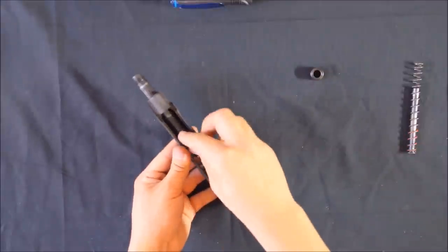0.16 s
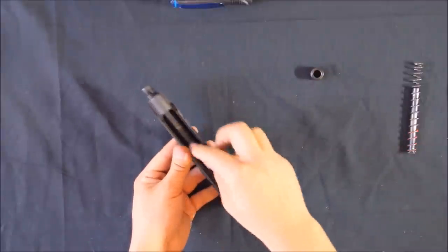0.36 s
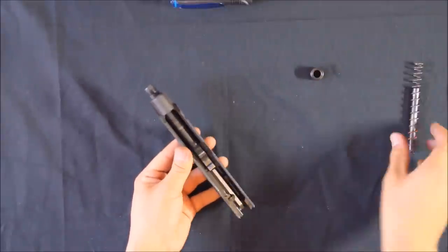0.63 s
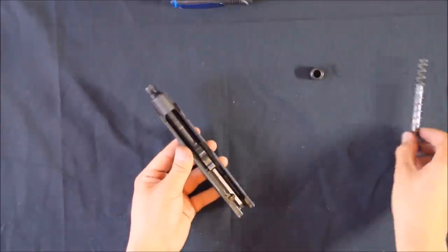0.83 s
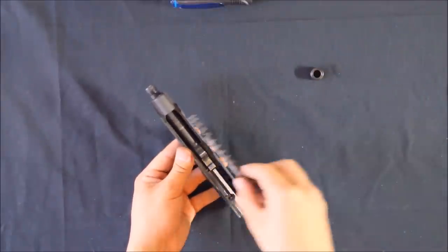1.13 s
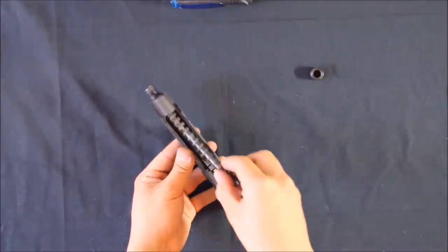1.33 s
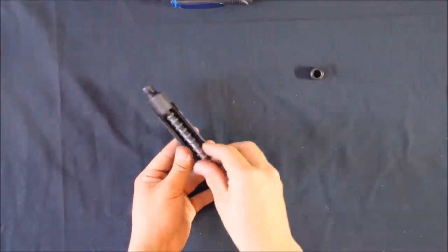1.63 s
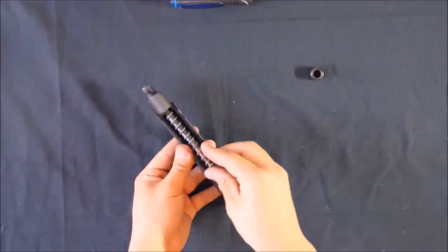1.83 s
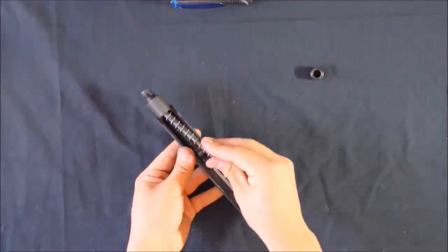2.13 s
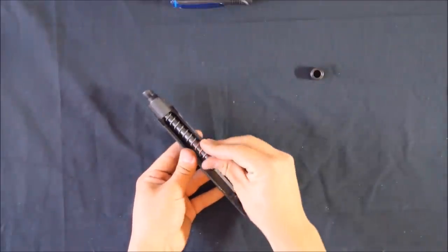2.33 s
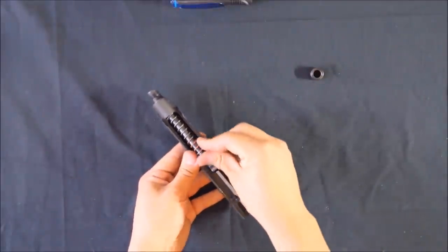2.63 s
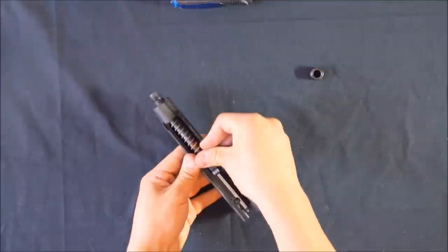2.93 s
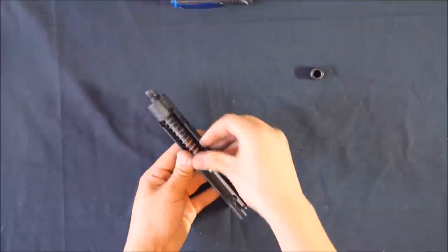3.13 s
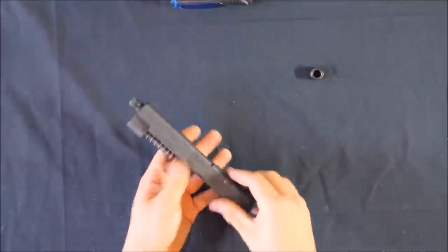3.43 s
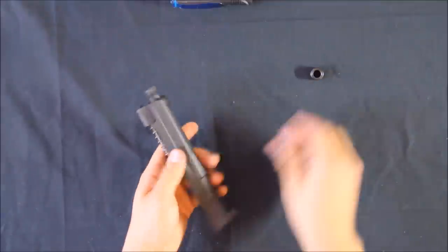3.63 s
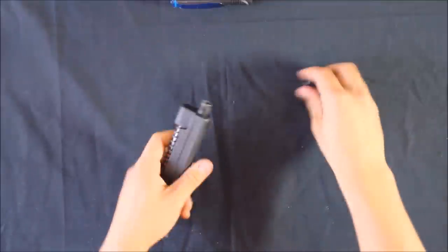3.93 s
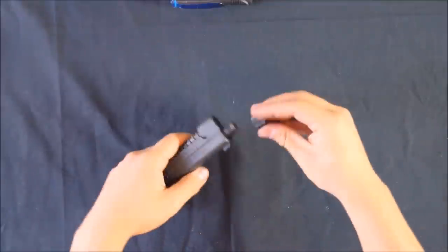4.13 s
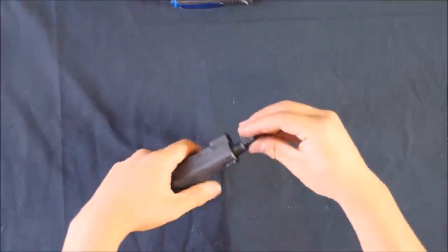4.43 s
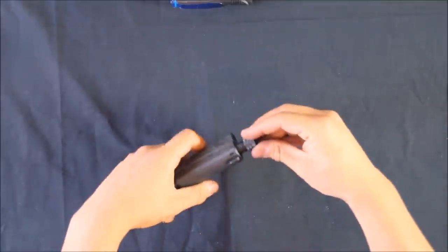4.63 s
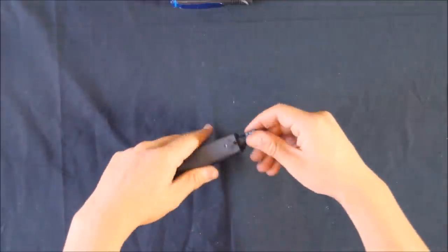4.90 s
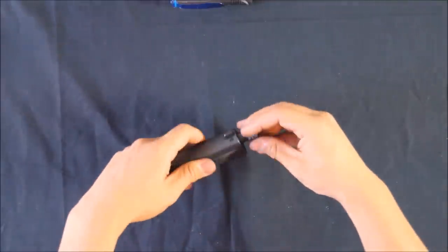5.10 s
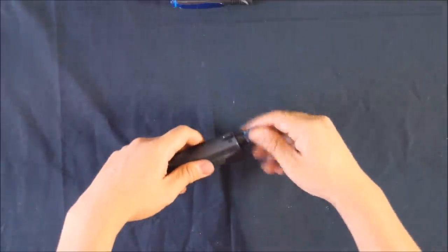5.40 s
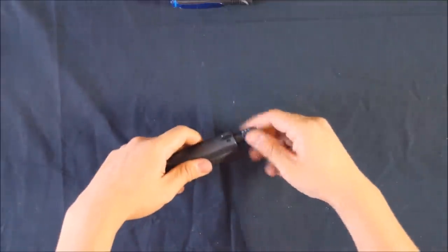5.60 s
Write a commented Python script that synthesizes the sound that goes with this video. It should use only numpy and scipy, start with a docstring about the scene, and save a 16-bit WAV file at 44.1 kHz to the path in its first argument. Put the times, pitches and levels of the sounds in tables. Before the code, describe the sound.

Steel pistol parts are fitted together by hand. A barrel drops into the slide with a quick cluster of clicks and a loud, bright clink. A spring grazes faintly, a guide rod clicks several times, then snaps sharply home. After a soft brush of hands, a small cap taps onto the muzzle with tiny thread squeaks. The sounds are close, in a small, hard-walled room with a faint fan hum.

```python
"""A faint scrape and a bright clink of steel come first: a barrel drops into a pistol slide, assembled by
hand over a cloth-covered table in a small, hard-walled room. The recoil spring grazes its way in, the
guide rod clicks and snaps home, hands brush, and a steel cap is set on the muzzle. Impacts excite the
damped modes of each part. A fan hums; the loudest blows clip and briefly duck the gain."""
import sys
import numpy as np
from scipy import signal
from scipy.fft import rfft, irfft, next_fast_len
from scipy.io import wavfile
from scipy.ndimage import map_coordinates

SR = 44100
rng = np.random.default_rng(int(sys.argv[2]) if len(sys.argv) > 2 else 0)


def master(y):
    """Save y as 16-bit WAV."""
    cut = np.clip(np.atleast_2d(y).T, -1, 1)
    pcm = np.round(cut * 32767)  # scale
    wavfile.write(sys.argv[1], SR, pcm.astype(np.int16))


N = 254016

# Clear modes of each steel part. Each row: frequency in Hz, relative level in dB, t60 in seconds.
SLIDE_MODES = [(1210, -27.5, 0.11), (1786, -12, 0.081), (2993, -15, 0.11), (3894, -16.5, .08),
               (4030, -13, 0.11), (4844, -6, .13), (4875, -9, .14), (4980, -12, .16), (5070, -10.5, 0.073),
               (6250, -10, 0.091), (7130, -14.5, 0.072), (7260, -12, 0.088), (8250, -14, .12),
               (8680, -6, 0.075), (10424, -13, .06), (11240, -10.5, 0.063), (11860, -10.5, .08),
               (13190, -13.5, .08), (15490, -16, .12)]
BARREL_MODES = [(1213, -28.5, 0.18), (1797, -21.5, 0.13), (4246, -6, 0.24), (4330, -7, 0.12),
                (5120, -18, 0.11), (7500, -10, .15), (7140, -13, 0.32), (7560, -8.5, 0.23), (8000, -15, .2),
                (8600, -24.5, 0.19), (11300, -8, .08), (11188, -10.5, .24), (11600, -15.5, .08),
                (12200, -22.5, 0.18), (12905, -18.5, .2), (16600, -18, .22)]
SPRING_MODES = [(6150, -6.5, 0.03), (7536, -10.5, 0.087), (8040, -4, 0.099), (12311, -19, .12),
                (12500, -8, 0.12), (13382, -11, 0.067), (14346, -18, .1)]
ROD_MODES = [(1226, -18, 0.08), (1780, -14, 0.064), (2350, -17.5, 0.14), (2450, -13.5, 0.066),
             (2790, -11.5, 0.081), (3154, -16, .06), (3820, -20, 0.095), (4200, -10, 0.13),
             (4870, -16, 0.11), (7034, -18, 0.068), (7950, -14.5, 0.087), (11000, -11.5, .06),
             (12080, -11, .06), (13190, -22, .06)]
SEAT_MODES = [(2870, -19.5, 0.14), (3880, -11.5, 0.082), (4120, -18.5, 0.15), (5070, -13.5, .2),
              (5000, -38.5, .13), (5537, -1, 0.069), (7950, 2, 0.042), (12500, -16, 0.18)]
CAP_MODES = [(2326, -16, 0.085), (3015, -13.5, 0.098), (3730, -12, 0.042), (3840, -3, 0.028),
             (4160, -17.5, 0.092), (5665, -23, 0.14), (7540, -22, .06), (8030, -23, 0.081),
             (12200, -10.5, 0.049), (12800, -13.5, 0.073), (15040, -31, .08)]
# Spectra of the dense, quickly damped modes. Each row: frequency in Hz, relative level in dB.
SLIDE_CLACK = [(100, -51), (800, -41), (1400, -20), (2400, -0.5), (4300, 0), (6500, -6.5), (8000, -3),
               (9500, -13), (12000, -11), (15500, -23.5)]
BARREL_CLACK = [(100, -41.5), (450, -35), (750, -17.5), (1500, -14.5), (3000, -12.5), (4300, 2),
                (5200, -2.5), (6600, -10.5), (7500, 0.5), (9300, -10), (11200, -3.5), (13000, -11),
                (15500, -16)]
SPRING_CLACK = [(100, -39), (1500, -17.5), (4000, -11.5), (5800, -9.5), (9500, -13), (13000, -10.5),
                (16000, -4.5)]
ROD_CLACK = [(100, -29), (900, -73.5), (1400, -13), (2600, 6.5), (4300, 7), (5600, -0.5), (7500, -0.5),
             (9200, -5), (12000, -9.5), (15500, -8)]
SEAT_CLACK = [(100, -15), (600, -18.5), (1100, -26), (1600, -11), (2400, -5), (4000, 2), (6500, -3),
              (9500, -10), (12000, -8.5), (15500, -11.5)]
CAP_CLACK = [(100, -38), (1900, -24), (2600, 4.5), (3900, 4.5), (5000, 0.5), (7200, 1), (10500, -4),
             (12500, -5.5), (16000, -2.5)]
# Impacts. Each row: start in seconds, level in dB, brightness at 12 kHz in dB.
SLIDE_HITS = [(.1218, -13.5, -4), (.1275, -20, -1), (.1505, -32, 6.5), (.253, -47, 0), (.3045, -20.5, -2.5)]
BARREL_HITS = [(.3118, -3, -3), (.324, -21, -1), (.4904, -32, -11)]
SPRING_HITS = [(1.361, -57.5, 18), (1.374, -46.5, 5), (1.5546, -37.5, 0.5), (1.591, -43, 6),
               (1.7016, -47, 2), (1.8767, -49, 3.5), (1.956, -46.5, -1.5)]
ROD_HITS = [(1.715, -43, -19), (2.021, -34.5, -10), (2.0328, -32, -30), (2.2524, -44.5, -10.5),
            (2.2822, -40, 0), (2.3013, -28, 5.5), (2.4424, -40, -13), (2.5467, -23, -11.5),
            (2.7133, -41.5, 2.5), (2.7222, -31.5, -11.5)]
SEAT_HITS = [(2.839, -29, -9), (2.8422, -14, 1), (2.845, -9.5, 0.5), (2.85, -18, -0.5)]
CAP_HITS = [(4.3015, -28.5, 3), (4.305, -34, 6.5), (4.5527, -19.5, 0), (4.629, -42, -1), (4.824, -42, -2.5),
            (5.3858, -49, 1), (5.469, -47.5, -14.5)]
# Sideways pushes on the slide. Each row: start in seconds, level in dB.
SLIDE_NUDGES = [(0.4902, -39.5), (2.3014, -41)]
# Barrel, spring and cap rub on steel. Each row: middle in seconds, half length in seconds, level in dB.
BARREL_RUBS = [(0, 0.055, -42.5), (.302, 0.0032, -34.5), (.378, 0.031, -33), (.455, 0.06, -40.5)]
SPRING_RUBS = [(4.9, 0.031, -60.5), (5.07, 0.1, -59.5), (5.43, 0.025, -56.5), (5.645, 0.021, -61)]
CAP_RUBS = [(4.385, 0.093, -54.5), (4.433, 0.011, -54), (4.535, 0.011, -32.5)]
# A brief soft hiss leading into the rod's click, then a fainter one.
# Each row: middle in seconds, half length in seconds, level in dB.
ROD_HISSES = [(2.29, 0.018, -46), (2.47, 0.017, -61)]
# The thread catches the cap. Each row: time of the catch in seconds, half length in seconds, level in dB.
THREAD_SQUEAKS = [(4.383, .008, -51.5), (4.419, 0.0097, -45.5), (4.442, .005, -42.5), (4.524, .014, -43)]
# Palms on slide and cloth. Each row: middle in seconds, half length in seconds, level in dB.
PALM_STROKES = [(3.269, 0.054, -57), (3.542, 0.041, -59.5), (3.889, 0.057, -55.5)]
# Noise spectra of squeak, skin and room air. Each row: frequency in Hz, relative level in dB.
SQUEAK_SPECTRUM = [(2000, -55), (2800, -18), (3020, 9), (3200, -28), (3600, -10), (4200, -36), (6000, -70)]
SKIN_SPECTRUM = [(60, -31), (250, 6), (1300, -6), (3000, -17), (9000, -21), (16000, -17)]
AIR_SPECTRUM = [(12, -42.5), (20, -17), (55, -7), (113, -10.5), (146, -2.5), (172, -6), (434, -5),
                (472, -10.5), (542, -9.5), (873, -16), (1000, -14), (2260, -17.5), (3950, -22.5),
                (5850, -21.5), (16000, -31.5)]
# Tones of the fan. Each row: frequency in Hz, rms level in dB.
FAN_TONES = [(50, -80.5), (70, -74.5), (99, -80.5), (147, -72), (245, -78.5), (344, -71.5), (438.7, -69.5)]
# Swells of a far drone. Each row: middle in seconds, half length in seconds, rise in dB.
DRONE_SWELLS = [(3.8, .45, 7), (5.35, .19, 14)]
# Reverberation time of the room. Each row: frequency in Hz, t60 in seconds.
ROOM_T60 = [(200, 0.17), (900, 0.3), (2200, 0.62), (5500, 0.52), (9000, 0.42), (15000, 0.29)]


def barrel():
    """Impact excites free vibration: the barrel knocks on the slide, drops in and shuffles, ringing."""
    knocks = touches(SLIDE_HITS, depth_db=-4.5, ring_db=-1, depth_slope=0.2)
    drops = touches(BARREL_HITS, depth_db=-3, ring_db=-3, depth_slope=0.1)
    knock = impacts(knocks, SLIDE_MODES, SLIDE_CLACK, crack_t60=0.0066, body_db=-7.5, body_t60=0.06)
    drop = impacts(drops, BARREL_MODES, BARREL_CLACK, crack_t60=0.0091, body_db=-7.5, body_t60=0.039)
    return knock + drop + grains(BARREL_RUBS, BARREL_MODES, SLIDE_CLACK, ring_db=-11.5, bright_db=-8.5)


def slide_ping(rise_s=0.004):
    """Selective excitation: a sideways nudge rings only the lowest mode of the slide's walls."""
    hz, _, t60 = SLIDE_MODES[0]
    track, t = np.zeros(N), clock(SR // 2)
    ping = np.sin(2 * np.pi * hz * t) * (1 - np.exp(-t / rise_s))
    for start, db in SLIDE_NUDGES:
        add(track, start, amp(db - 60 * t / t60) * ping)
    return track


def rod_snap():
    """Stored elastic energy becomes impact: the spring throws the rod into its seat on the barrel."""
    hits = touches(SEAT_HITS, depth_db=1.5, ring_db=-7)
    return impacts(hits, SEAT_MODES, SEAT_CLACK, crack_t60=0.024, body_db=4.5, body_t60=0.033)


def muzzle_cap(tick_over_squeak_db=6, tick_bright_db=-11):
    """Stick and slip: the cap taps and scrapes on the muzzle; each catch of the thread ticks and sings."""
    ticks = [(start, db + tick_over_squeak_db, tick_bright_db) for start, _, db in THREAD_SQUEAKS]
    hits = touches(CAP_HITS + ticks, depth_db=-4, ring_db=-3, depth_slope=0.28, edge_slope=0.4)
    taps = impacts(hits, CAP_MODES, CAP_CLACK, crack_t60=0.016, body_db=-20.5, body_t60=0.04)
    envelope = sum(amp(db) * swell(start + half / 2, half) for start, half, db in THREAD_SQUEAKS)
    squeaks = noise(SQUEAK_SPECTRUM) * envelope
    return taps + squeaks + grains(CAP_RUBS, CAP_MODES, CAP_CLACK, ring_db=-6, bright_db=-10)


def guide_rod():
    """Impacts ring the rod's modes as the spring is squeezed; a brief soft hiss leads into one click."""
    hits = touches(ROD_HITS, depth_db=5, ring_db=-2, depth_slope=-0.35, edge_slope=0.5)
    clicks = impacts(hits, ROD_MODES, ROD_CLACK, crack_t60=0.02, body_db=-11.5, body_t60=0.055)
    return clicks + grains(ROD_HISSES, ROD_MODES, ROD_CLACK, ring_db=-10, bright_db=-10)


def recoil_spring(held_from_s=1.65, first_coil_s=1.415, coil_gap_s=0.0535, coil_half_s=0.023):
    """Contact damping: coils graze the slide with a thin ring; the ticks dull once the thumb holds on."""
    free = touches([hit for hit in SPRING_HITS if hit[0] < held_from_s], depth_db=0.5, ring_db=-1)
    held = touches([hit for hit in SPRING_HITS if hit[0] >= held_from_s], depth_db=-2, ring_db=-23)
    ticks = impacts(free + held, SPRING_MODES, SPRING_CLACK, crack_t60=0.02, body_db=-19, body_t60=0.12)
    # Four coils pass the edge at an even pace, each pressed harder and so 3 dB louder.
    coils = [(first_coil_s + k * coil_gap_s, coil_half_s, -56 + 3 * k) for k in range(4)]
    return ticks + grains(coils + SPRING_RUBS, SPRING_MODES, SPRING_CLACK, ring_db=-7, bright_db=-3)


def touches(hits, depth_db, ring_db, depth_slope=0, edge_slope=0, ring_loss=0.12):
    """Force sets timbre: light touches ring less. Slopes (dB per dB) tie depth to force, ring to edge."""
    hardest_db = max(db for _, db, _ in hits)
    voiced = []
    for start, db, bright_db in hits:
        lighter_db = hardest_db - db
        hit_depth_db = depth_db + depth_slope * lighter_db
        hit_ring_db = ring_db - ring_loss * lighter_db + edge_slope * bright_db
        voiced.append((start, db, hit_depth_db, bright_db, hit_ring_db))
    return voiced


def impacts(hits, modes, clack, crack_t60, body_db, body_t60):
    """The shape of a contact filters the blow: flat faces sound deep, sharp edges bright."""
    track = np.zeros(N)
    for start, db, depth_db, bright_db, ring_db in hits:
        hit = blow(modes, clack, ring_db, crack_t60, body_db, body_t60)
        add(track, start, amp(db) * causal_filter(hit, [(1500, depth_db), (4200, 0), (12000, bright_db)]))
    return track


def grains(bursts, modes, clack, ring_db, bright_db, pulses_per_s=2500):
    """Convolution: a hail of tiny pulses, each ringing the part's modes, merges into a rub or a hiss."""
    track = np.zeros(N)
    for middle, half, db in bursts:
        pulses = unit(rng.standard_normal(N) * (rng.random(N) < pulses_per_s / SR)) * swell(middle, half)
        response = blow(modes, clack, ring_db, crack_t60=0.014, body_db=0, body_t60=0.04)
        response = causal_filter(response, [(4200, 0.001), (12000, bright_db)])
        track += amp(db) * signal.oaconvolve(pulses, response / np.linalg.norm(response))[:N]
    return track


def blow(modes, clack, ring_db, crack_t60, body_db, body_t60, linewidth_hz=14, rise_s=0.00014):
    """Modal superposition: a sharp crack, then dense and clear modes that the grip lowers by ring_db."""
    t = clock(SR // 2)
    crack_decay = amp(-60 * t / crack_t60)
    body_decay = amp(ring_db + body_db - 60 * t / body_t60)
    dense = noise(clack, len(t)) * (crack_decay + body_decay)
    ring = np.zeros(len(t))
    for hz, db, t60 in modes:
        # Each blow favours other modes, and the loose contact makes them waver.
        scatter_db, phase = rng.standard_normal(2)
        drift = np.cumsum(rng.standard_normal(len(t))) * np.sqrt(2 * np.pi * linewidth_hz / SR)
        ring += amp(db + scatter_db - 60 * t / t60) * np.sin(2 * np.pi * (hz * t + phase) + drift)
    return (dense + amp(ring_db) * ring) * (1 - np.exp(-t / rise_s))


def hands():
    """Soft friction gives broadband noise: palms brush slide and cloth unevenly as the grip changes."""
    strokes = sum(amp(db) * swell(middle, half) for middle, half, db in PALM_STROKES)
    return strokes * noise(SKIN_SPECTRUM) * amp(0.99 * wobble(65))


def fan():
    """A fan hums in steady partials, each slightly modulated in amplitude and phase."""
    hum = np.zeros(N)
    for hz, db in FAN_TONES:
        peak = np.sqrt(2) * amp(db + 1.5 * wobble(1.5))
        hum += peak * np.sin(2 * np.pi * hz * clock() + 0.78 * wobble(2.8))
    return hum


def far_drone(start_hz=70.3, sag_hz_per_s=3.8, resting_db=-78):
    """A low tone sags in pitch and swells twice; its phase is the integral of its frequency."""
    hz = start_hz - sag_hz_per_s * clock()
    rise_db = sum(db * swell(middle, half) for middle, half, db in DRONE_SWELLS)
    return np.sqrt(2) * amp(resting_db + rise_db) * np.sin(2 * np.pi * np.cumsum(hz) / SR)


def room_air():
    """The ambient noise floor: coloured noise whose level flickers slightly."""
    return amp(-60.5 + 0.51 * wobble(17)) * noise(AIR_SPECTRUM)


def in_room(x, wet_db, early_db=-9, echo_count=8, build_s=0.0066):
    """Reflection adds echoes from table and walls and a diffuse tail, unique to each part's position."""
    hz, t, spectrogram = signal.stft(rng.standard_normal(SR), SR, nperseg=256)
    decay = amp(-60 * t / along(ROOM_T60, hz)[:, None])
    tail = signal.istft(spectrogram * decay, SR, nperseg=256)[1][:SR]
    tail *= 1 - np.exp(-(clock(SR) / build_s) ** 2)
    echoes = np.zeros(SR)
    echoes[(rng.uniform(0.002, 0.022, echo_count) * SR).astype(int)] = rng.standard_normal(echo_count)
    response = amp(wet_db) * tail / np.linalg.norm(tail) + amp(early_db) * echoes / np.linalg.norm(echoes)
    return x + signal.fftconvolve(x, response)[:N]


def gain_control(x, threshold_db=-7, recovery_db_per_s=20, attack_s=0.0029):
    """Dynamic compression: peaks over the threshold turn the gain down, and it creeps back."""
    excess_db = np.maximum(20 * np.log10(np.abs(x) + 1e-9) - threshold_db, 0)
    ramp_db = recovery_db_per_s * clock()
    held_db = np.maximum.accumulate(excess_db + ramp_db, axis=-1) - ramp_db
    pole = np.exp(-1 / (attack_s * SR))
    return x * amp(-signal.lfilter([1 - pole], [1, -pole], held_db))


def amp(db):
    """Decibels to amplitude ratio."""
    return 10 ** (np.asarray(db) / 20)


def unit(x):
    """Normalisation to rms 1."""
    return x / np.sqrt(np.mean(x ** 2) + 1e-20)


def along(points, hz):
    """Interpolation of (Hz, value) points on a logarithmic frequency axis."""
    frequencies, values = np.transpose(points)
    return np.interp(np.log(hz + 1), np.log(frequencies), values)


def clock(size=N):
    """Sample times in seconds."""
    return np.arange(size) / SR


def wobble(knots_per_s):
    """A smooth spline through random knots."""
    return map_coordinates(rng.standard_normal(int(N * knots_per_s / SR) + 4), [clock() * knots_per_s])


def noise(spectrum, size=N):
    """Spectral shaping turns white noise into coloured noise of rms 1."""
    hz = np.fft.rfftfreq(size, 1 / SR)
    return unit(irfft(rfft(rng.standard_normal(size)) * amp(along(spectrum, hz)), size))


def causal_filter(x, spectrum, size=512):
    """Minimum-phase filtering by (Hz, dB) points: the cepstrum is folded onto positive time."""
    cepstrum = irfft(np.log(amp(along(spectrum, np.fft.rfftfreq(size, 1 / SR)))))
    cepstrum[1:size // 2] *= 2
    cepstrum[size // 2 + 1:] = 0
    return signal.fftconvolve(x, irfft(np.exp(rfft(cepstrum))))[:len(x)]


def swell(middle, half):
    """A Gaussian envelope that falls to 1/e at one half length from its middle."""
    return np.exp(-((clock() - middle) / half) ** 2)


def add(track, start, sound):
    """Superpose a sound on the track at a start time in seconds."""
    remaining = track[max(round(start * SR), 0):][:len(sound)]
    remaining += sound[:len(remaining)]


def scene():
    """Linear superposition: the reverberant steel parts, the hands and the background, in one channel."""
    steel = in_room(barrel() + slide_ping(), wet_db=-9)
    steel += in_room(recoil_spring(), wet_db=-8)
    steel += in_room(guide_rod(), wet_db=-8.5)
    steel += in_room(rod_snap(), wet_db=-6.5)
    steel += in_room(muzzle_cap(), wet_db=-10.5)
    return (steel + hands() + fan() + far_drone() + room_air())[None]


def record(dry, ceiling_db=-4, top_hz=15850):
    """Saturation rounds the peaks that outrun the gain control; a steep low-pass limits the band."""
    ducked = gain_control(dry)
    clipped = ducked / (1 + (ducked / amp(ceiling_db)) ** 4) ** (1 / 4)
    size = next_fast_len(N + SR)
    hz = np.fft.rfftfreq(size, 1 / SR)
    lowpass_db = np.interp(hz, [top_hz - 200, top_hz + 200, top_hz + 900], [0, -25, -70])
    return irfft(rfft(clipped, size) * amp(lowpass_db), size)[:, :N]


dry = scene()
out = record(dry)
master(out)
```